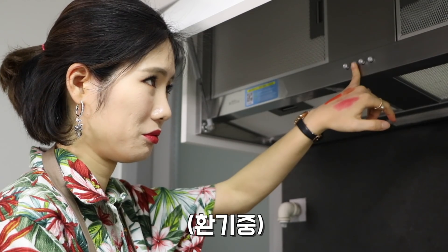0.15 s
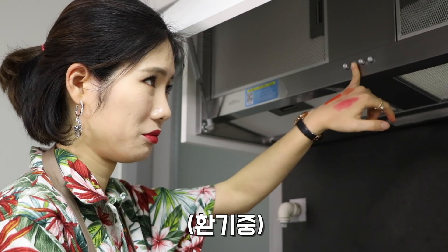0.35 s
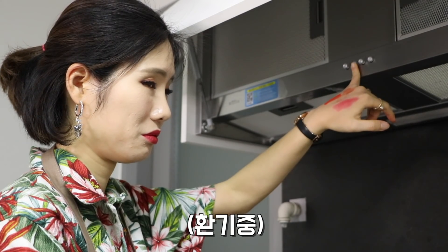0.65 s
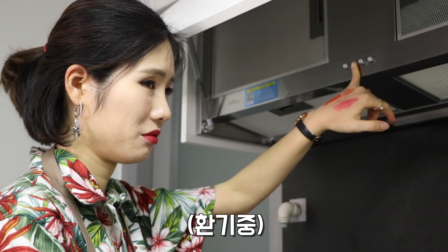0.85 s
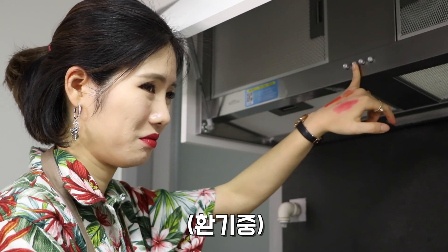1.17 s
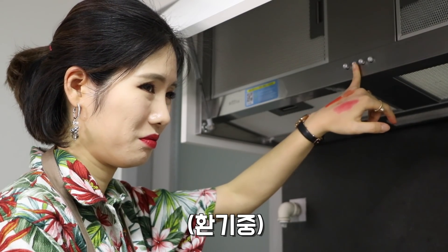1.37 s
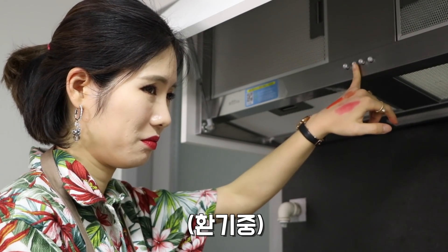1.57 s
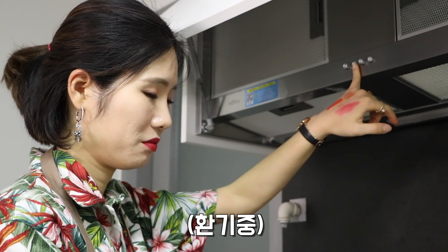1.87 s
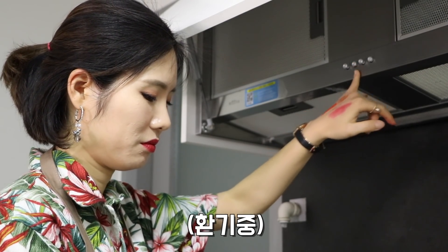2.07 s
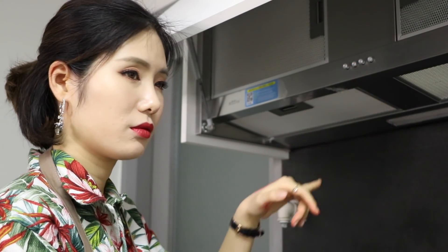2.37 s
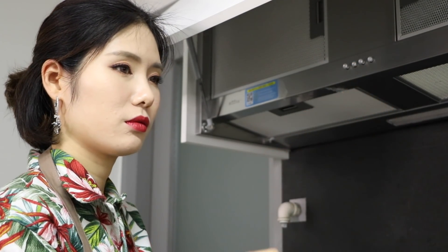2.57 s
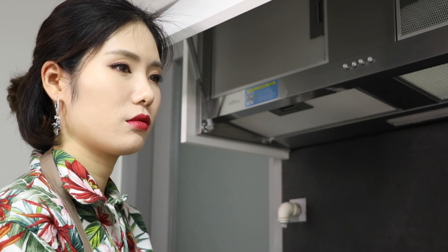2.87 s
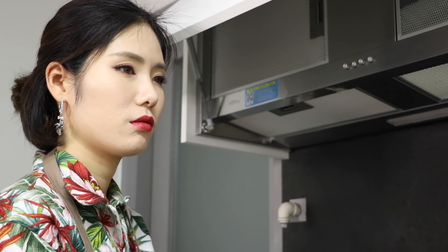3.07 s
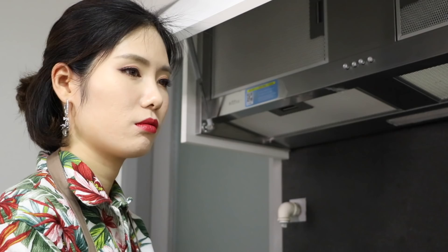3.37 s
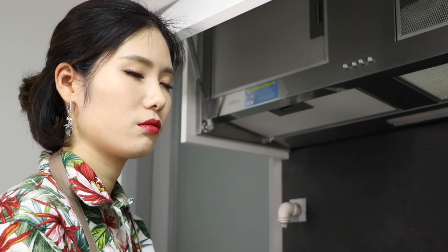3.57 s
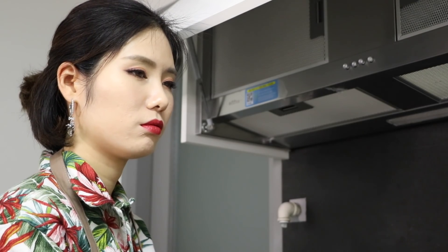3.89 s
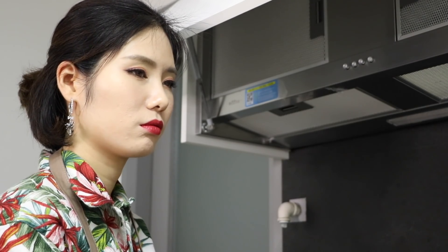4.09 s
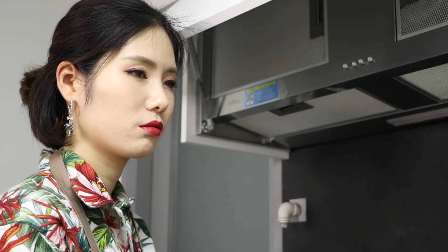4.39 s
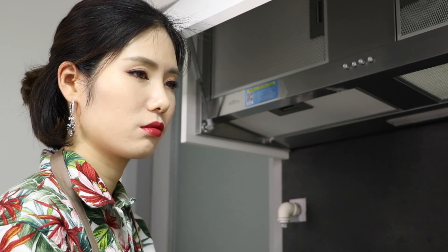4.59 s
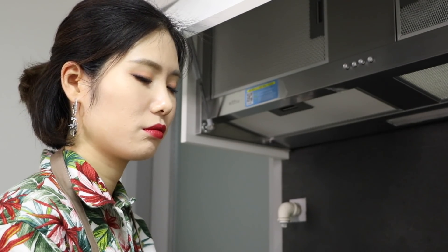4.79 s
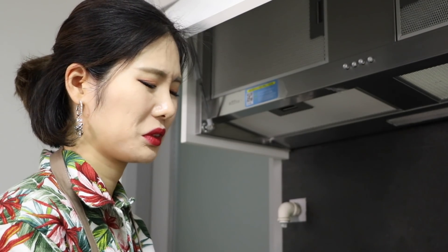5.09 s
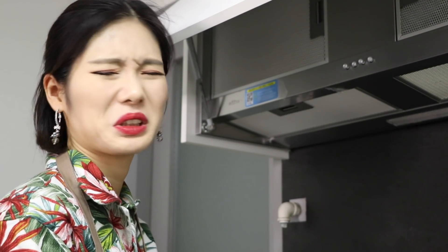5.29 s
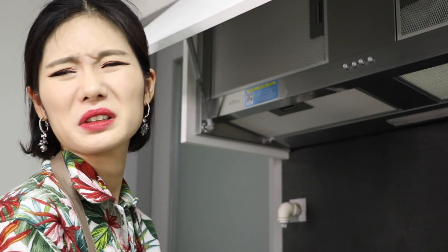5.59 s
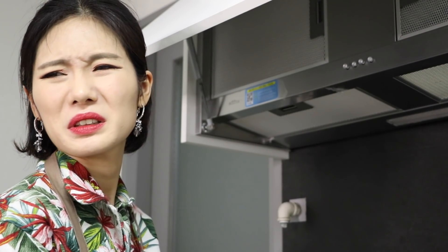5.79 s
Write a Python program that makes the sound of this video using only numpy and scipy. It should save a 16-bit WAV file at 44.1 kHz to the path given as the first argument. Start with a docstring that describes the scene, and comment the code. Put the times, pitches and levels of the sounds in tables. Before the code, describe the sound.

Throughout the roughly six seconds, a kitchen range hood fan runs at constant speed, already going at the start and still going at the end. The main sound is a low, dense, boxy roar of turbulent air resonating in duct and hood, slightly rough but even. A weak, steady low motor hum is buried in it. Above lies a much softer hiss of air through the mesh, fluttering finely, with brief irregular swells: a noticeable one at about 0.1 seconds, smaller ones near 1.0, 1.65, 3.6 and 4.6, and the strongest at about 5.6. Around 3.3 seconds one tiny, blurred high chink is barely audible, mostly right. The low roar is almost centred, while the treble is wider and brighter on the right, where the fan is nearer. Two closely spaced microphones pick it up in a small hard-walled kitchen with short, dull reflections.

```python
"""Kitchen range hood fan

A fan runs steadily, a little to the right of two microphone ports. Noise rung through resonances of
duct and kitchen makes the roar, and noise with short rises in its treble makes the hiss of the mesh.
A sine at twice the mains frequency is the motor hum, and one faint high ping is something small chinking.
"""
import sys
import numpy as np
from scipy.fft import rfft, irfft, next_fast_len
from scipy.io import wavfile
from scipy.ndimage import map_coordinates

SR = 44100
rng = np.random.default_rng(int(sys.argv[2]) if len(sys.argv) > 2 else 0)


def generate_wav(sig):
    """Save sig (samples, or channels by samples) to the path in sys.argv[1] as 16-bit PCM at SR."""
    pcm = np.round(np.clip(np.atleast_2d(sig).T, -1, 1) * 32767).astype(np.int16)
    wavfile.write(sys.argv[1], SR, pcm)


N = 262174  # length of the sound in samples

FAN_DB = -6.5  # level shift shared by the roar and the hiss
FAN_LAG_S = 7e-5  # the fan's air noise reaches the left port this much later
CLUMP_SLOW_DB, CLUMP_FAST_DB = 0.24, 0.84  # unevenness of the turbulence behind the blades


def roar():
    """Turbulence behind the blades comes in loose clumps and rings the duct and the kitchen."""
    clumps = amp(CLUMP_SLOW_DB * wobble(3.58) + CLUMP_FAST_DB * wobble(20))
    return amp(FAN_DB) * filtered(clumps * turbulence(FAN_LAG_S), duct)


# Resonances of duct, hood and kitchen, before the shared level shift:
# (f/Hz, width/Hz, left level/dB, right level/dB)
RESONANCES = [(39, 12, -23, -21), (63.4, 16, -17.5, -15.5), (82.8, 5.9, -16.5, -12.5),
              (117.4, 28, -8.5, -8), (130, 12, -5, -5), (148, 21, -6, -5), (173.4, 24, -1.5, -1.5),
              (189.3, 22, -2.5, -3), (216.3, 11.2, -2, -0.5), (226.5, 14.6, 2.5, 1),
              (267.2, 20, -2.5, -0.5), (278.2, 17, -4, -1.5), (307.2, 17, -3.5, -4), (317, 18.5, -0.5, 0.5),
              (337.5, 19, -1.7, -0.5), (353.6, 11, -25, -10.5), (384, 29, -12.5, -11),
              (399, 10.4, -9.5, -7.5), (413.4, 16, -16, -11), (444, 39, -12, -12.5),
              (476.5, 16, -29, -10.5), (508.5, 11.5, -9, -11.5), (533.8, 26.7, -10.5, -14.5),
              (574, 57, -18.5, -17.5), (610, 23, -20, -20), (662, 31, -21, -16), (702, 34.4, -16.5, -14),
              (786, 20, -17, -23), (846, 11, -20, -15), (878, 36, -20.5, -22), (971, 66, -23.5, -24),
              (1042.5, 15.4, -20, -16), (1124, 10, -26, -19), (1168, 45, -20.5, -21),
              (1235, 44, -25, -21.5), (1288, 28, -27, -20), (1449.5, 23, -23, -20), (1512, 33, -27, -25),
              (1580, 43, -36, -32), (1646, 41, -28, -24), (1810, 69, -39, -31.5), (1988, 100, -31, -29),
              (2416, 83, -39, -34.5), (2900, 70, -38, -33), (3274, 82, -37, -33), (3734, 60, -41, -35.5)]
# Cancellations between the resonances: (f/Hz, width/Hz, depth/dB)
CANCELLATIONS = [(201.8, 4.4, 7), (137, 6.7, 2), (244, 10, 5), (290, 5.2, 2), (428, 8, 1), (461, 8, 3),
                 (494, 10, 4), (648, 11, 6), (1070, 10, 8), (1524, 14, 4)]


def duct(hz):
    """Steep resonances add as powers, then the cancellations cut narrow gaps between them."""
    low = hz[hz < 5000, None]  # the resonances are only computed below 5 kHz
    centre, width, *side_db = np.transpose(RESONANCES)
    distance = 2 * (low - centre) / width
    peaks = 1 / (1 + distance ** 2) ** 2
    power = amp(side_db) ** 2 @ peaks.T

    centre, width, depth_db = np.transpose(CANCELLATIONS)
    distance = 2 * (low - centre) / width
    cut = amp(-np.exp(-distance ** 2) @ depth_db)
    silent_above = ((0, 0), (0, len(hz) - len(low)))
    return np.pad(np.sqrt(power) * cut, silent_above)


# How alike the noise is at the two ports: (f/Hz, likeness 0-1)
LIKENESS = [(30, .96), (60, 0.97), (100, 1), (300, .99), (380, 0.95), (440, 0.88), (560, 0.87), (700, 0.77),
            (800, 0.62), (1200, 0.54), (1700, 0.36), (2200, 0.28), (6000, 0.32), (8500, 0.13)]


def turbulence(lag_s):
    """White noise at both ports, most alike in the bass; the left port hears it later."""
    def shared_and_opposite(hz):
        likeness = np.clip(along(LIKENESS, hz)[0], 0, 1)
        angle = np.arccos(likeness) / 2
        return np.array([np.cos(angle), np.sin(angle)])

    def half_lag_each_way(hz):
        return np.exp(np.outer([-1j, 1j], np.pi * hz * lag_s))

    mid, side = filtered(rng.standard_normal((2, N)), shared_and_opposite)
    return filtered(np.array([mid + side, mid - side]), half_lag_each_way)


LEFT_SHARE, LEFT_LATE_S = 0.77, 0.0064  # left gets the surge weaker and later, mostly off the walls
# Broad air noise, as filter gain before the shared level shift: (f/Hz, left level/dB, right level/dB)
AIR_NOISE = [(30, -60, -59), (300, -31.5, -31), (794, -25, -23.5), (1270, -26, -24.5), (1650, -29.5, -29),
             (1780, -36, -30), (2360, -34.5, -31), (2920, -36, -32.5), (3710, -39, -35),
             (4880, -45.5, -43.5), (6540, -46.5, -41), (8000, -48, -42.5), (10030, -51, -46.5),
             (12350, -57.5, -52), (15700, -61, -63)]
# Share of the air noise that follows the surges: (f/Hz, share 0-1)
SURGE_SHARE = [(1400, 0.02), (2200, 0.46), (3400, 0.75), (5000, 0.45), (9000, 1), (12000, 1.0),
               (15000, .75)]


def hiss():
    """Air through the mesh: surges and flutter move the treble, more at the nearer right port."""
    air = filtered(turbulence(FAN_LAG_S), lambda hz: amp(along(AIR_NOISE, hz) + FAN_DB))
    treble = filtered(air, lambda hz: np.clip(along(SURGE_SHARE, hz), 0, 2))
    surge_db = surges()
    late_db = np.roll(surge_db, round(LEFT_LATE_S * SR))
    gain = amp(np.array([LEFT_SHARE * late_db, surge_db]))
    surging_air = air + (gain - 1) * treble
    return kitchen(surging_air, t60=0.31, wet_db=-7.0, dull_hz=2520)


SMALL_PER_S = 3  # small surges per second, at random times
SMALL_DB, SMALL_HALF_S = 1, 0.015  # mean rise and mean half length of a small surge
CALM_DB = -0.73  # treble level between surges
FLUTTER_SLOW_DB, FLUTTER_FAST_DB = 0.03, 0.85  # depth of the flutter
# Surges of hiss at set times, faint to strong, before each port and frequency takes its share:
# (peak t/s, rise in level/dB, half length t/s)
TIMED_SURGES = [(.03, 0.5, .03), (0.1, 6, 0.042), (.2, 2, .015), (.66, 2, .04), (1.012, 3.8, .008),
                (1.49, 2, .02), (1.65, 4.5, .016), (2.294, 2.5, .02), (3.013, 2.8, 0.027),
                (3.24, 1.5, .035), (3.62, 3, .015), (3.885, 2, .012), (4.248, 3, .018), (4.58, 4, 0.022),
                (5.152, 3, 0.012), (5.56, 2.5, 0.023), (5.62, 3, .012), (5.632, 8, 0.04), (5.7, 1, 0.031)]


def surges():
    """Treble gain in dB: smooth bumps for timed and small random surges, on top of a random flutter."""
    t = np.arange(N) / SR
    when, size, length = rng.random((round(SMALL_PER_S * N / SR), 3)).T
    small = zip(when * N / SR, 2 * SMALL_DB * size, SMALL_HALF_S * (0.5 + length))
    bumps = sum(rise_db * np.exp(-((t - peak_s) / half_s) ** 2)
                for peak_s, rise_db, half_s in [*TIMED_SURGES, *small])
    flutter = FLUTTER_SLOW_DB * wobble(9.8) + FLUTTER_FAST_DB * wobble(55)
    return CALM_DB + bumps + flutter


def kitchen(x, t60, wet_db, dull_hz):
    """Hard walls add a fixed, dull tail at each port, which ripples the spectrum finely."""
    t = np.arange(SR // 2) / SR
    tail = rng.standard_normal((2, len(t))) * amp(-60 * t / t60)  # falls 60 dB in t60 seconds
    tail = tail / np.linalg.norm(tail, axis=1, keepdims=True)
    wet = irfft(rfft(x) * rfft(tail, N), N)  # wraps round, so the tail is already there at the start

    def wet_share(hz):
        return amp(wet_db) / (1 + (hz / dull_hz) ** 2)

    def level(hz):  # direct sound and tail together keep their power
        return 1 / np.sqrt(1 + wet_share(hz) ** 2)

    return filtered(x, level) + filtered(wet, lambda hz: wet_share(hz) * level(hz))


HUM_HZ = 120


def hum():
    """Magnetic pull in the motor, twice per mains cycle, nearly steady and equal at both ports."""
    drift = 0.08 * wobble(3)  # in radians
    phase = 2 * np.pi * HUM_HZ * np.arange(N) / SR + drift
    return amp(-38.0 + 0.25 * wobble(1.1)) * np.sin(phase)


CHINK_S, CHINK_HZ, CHINK_DB, CHINK_HALF_S = 3.275, 7600, -55, 0.009  # peak time, pitch, right level, half length
CHINK_WAVER = 1.2  # depth of the random phase waver in radians


def chink():
    """Something small chinks once: a short, blurred high ping, stronger at the right port."""
    t = np.arange(N) / SR - CHINK_S
    phase = 2 * np.pi * CHINK_HZ * t + CHINK_WAVER * wobble(300)
    port_db = np.array([[-4], [0]])  # left, right
    swell = np.exp(-(t / CHINK_HALF_S) ** 2)
    return amp(CHINK_DB + port_db) * swell * np.sin(phase)


def amp(db):
    """Turn dB into gain."""
    return 10 ** (np.asarray(db) / 20)


def along(points, hz):
    """Read each value column of a (f/Hz, value, ..) table at hz, on a log frequency axis."""
    f, *columns = np.transpose(points)
    return np.array([np.interp(np.log(hz + 1), np.log(f + 1), column) for column in columns])


def wobble(rate):
    """A smooth random curve through rate random points a second."""
    knots = rng.standard_normal(int(N * rate / SR) + 4)
    return map_coordinates(knots, [np.arange(N) * rate / SR])


def filtered(x, response):
    """Shape x by a gain, possibly complex, that depends on frequency."""
    size = next_fast_len(N + SR // 2)
    spectrum = rfft(x, size) * response(np.fft.rfftfreq(size, 1 / SR))
    return irfft(spectrum, size)[..., :N]


def scene():
    """Roar, hiss, hum and chink add up in the air."""
    return roar() + hiss() + hum() + chink()


TOP_HZ = 15740


def record(dry):
    """The microphones' band limit lets nothing through from TOP_HZ upward."""
    to_nearest_end = np.minimum(np.arange(N), np.arange(N)[::-1])
    fade = np.clip(to_nearest_end / 8, 0, 1)  # 8 samples, against clicks at the ends
    return filtered(dry * fade, lambda hz: hz < TOP_HZ)


dry = scene()
out = record(dry)
generate_wav(out)
```